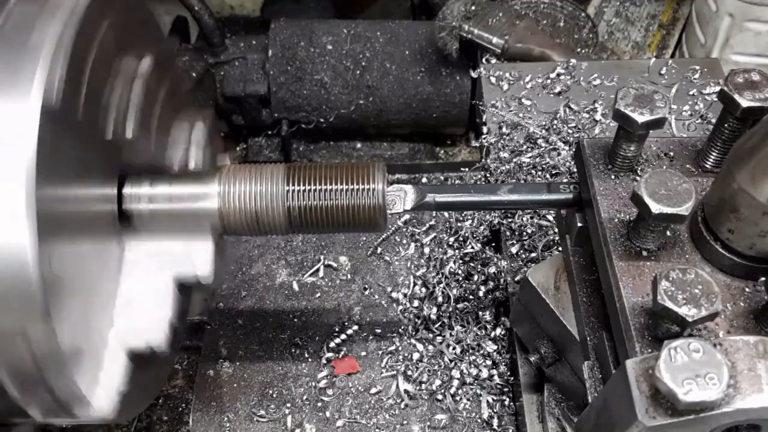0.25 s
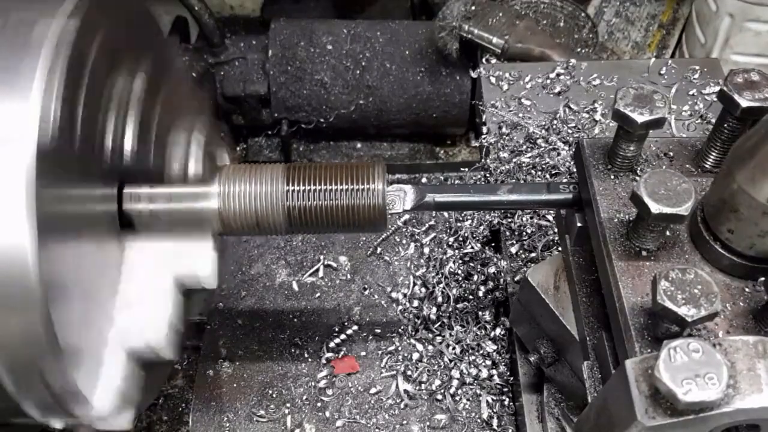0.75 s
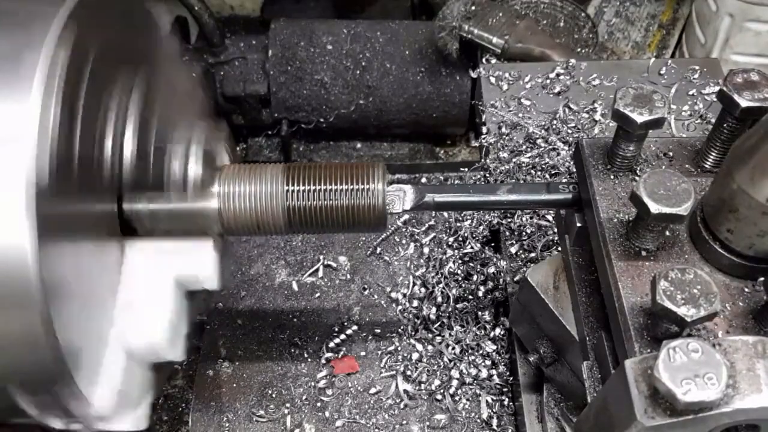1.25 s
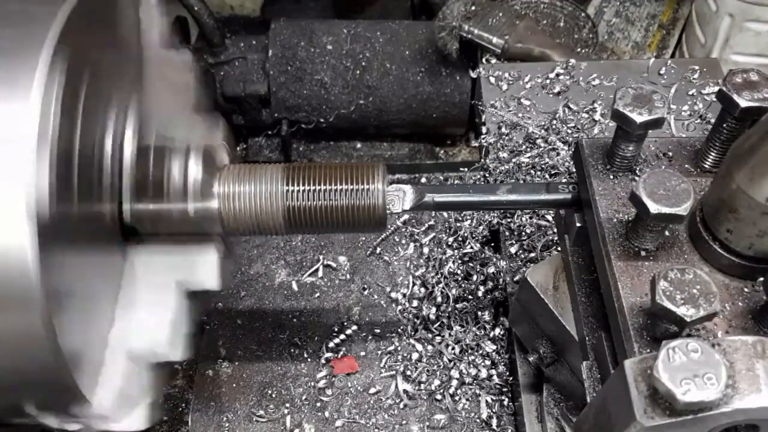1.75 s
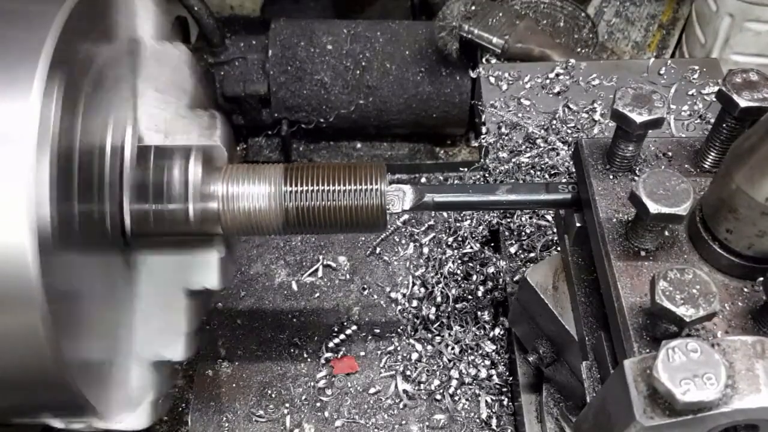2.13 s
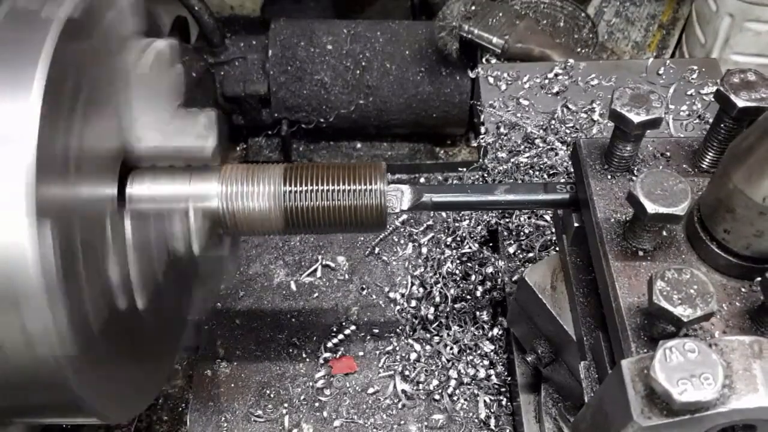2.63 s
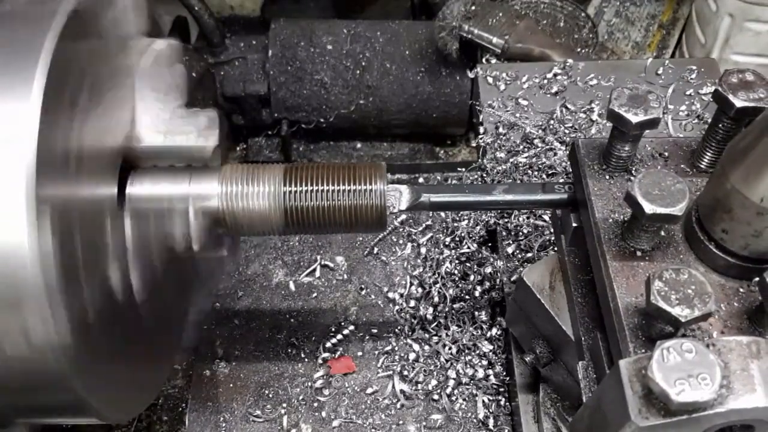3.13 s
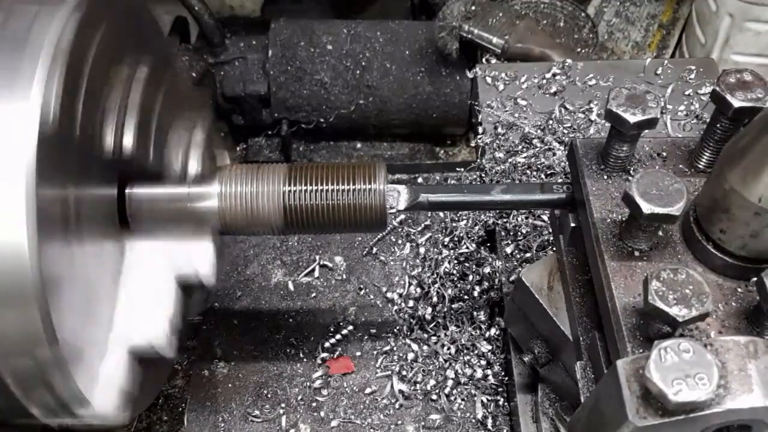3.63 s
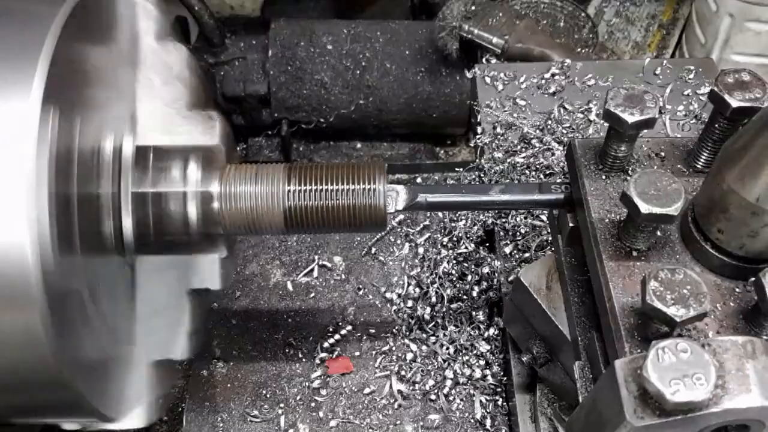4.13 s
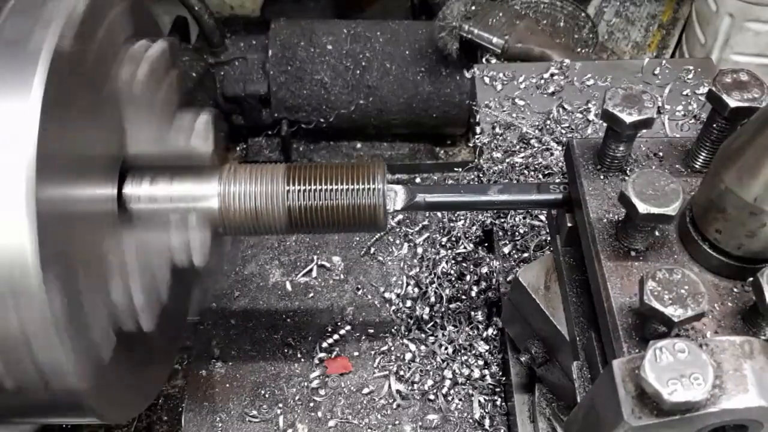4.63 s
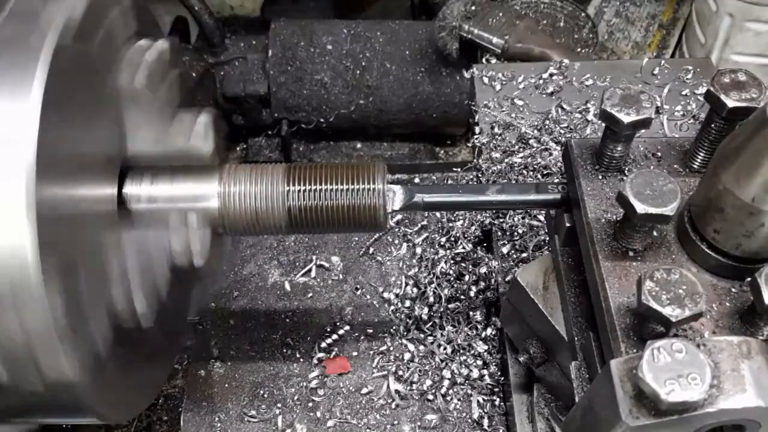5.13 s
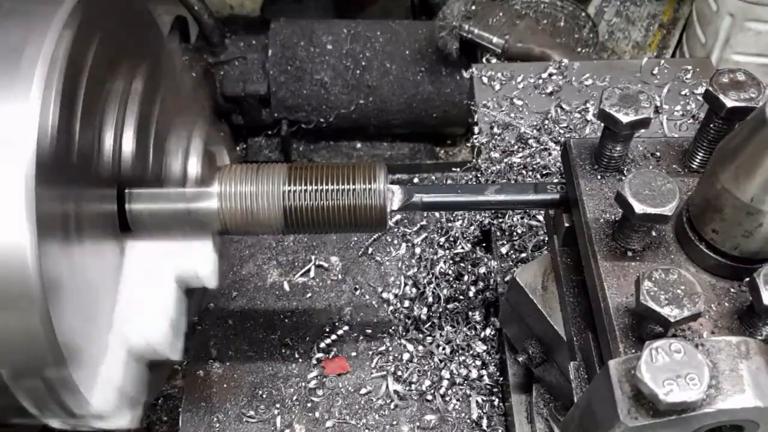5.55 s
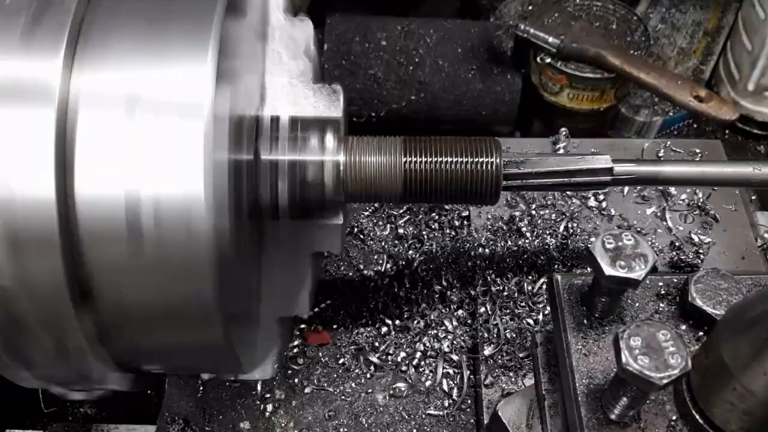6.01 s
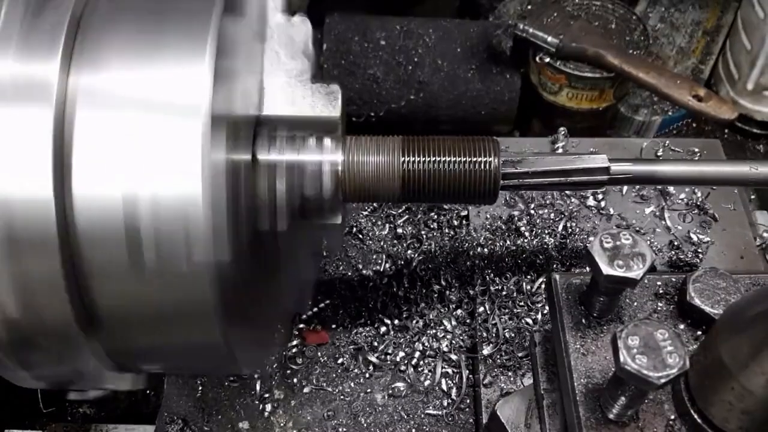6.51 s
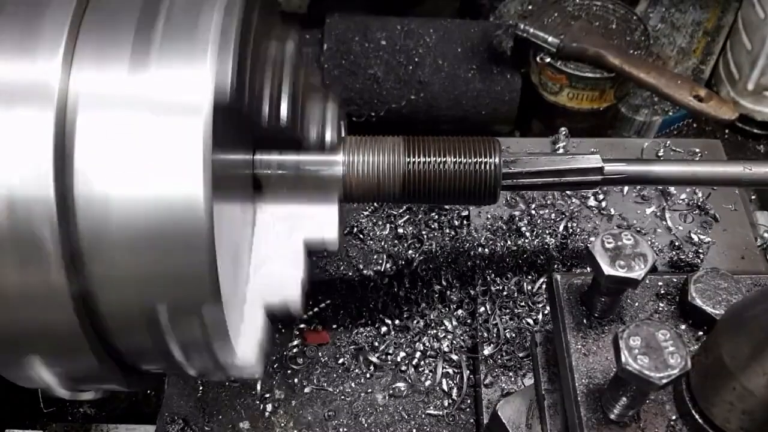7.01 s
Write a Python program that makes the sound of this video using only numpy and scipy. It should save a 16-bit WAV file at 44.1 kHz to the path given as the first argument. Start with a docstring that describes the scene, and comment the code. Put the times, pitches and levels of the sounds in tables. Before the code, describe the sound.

A stereo microphone near a metal lathe catches steady hum, buzzy whine and soft cutting hiss, with the tool singing at a high, slightly wobbling pitch. Another motor puffs in just before the sound jumps, sped up and far louder, into a shrill, fluttering metal shriek. It stops abruptly; the lathe continues quietly at its natural pitch, whirring and rumbling unevenly with light chip clicks and no squeal.

```python
"""Workshop: a lathe bores a steel bolt with motor hum, a whining rotor, a rumbling casing and a chattering bar.
Hum, whine and chatter are sums of sines; casing, chips and air are coloured noise with resonances.
The middle of the job plays about four times too fast and much louder: all of it jumps two octaves into a squeal.
After a hard cut the lathe drills at about natural speed, without chatter.
A second motor nearby, hum plus coloured hiss, runs for a moment across the jump into the fast part."""
import sys
import numpy as np
from scipy import signal
from scipy.fft import rfft, irfft, next_fast_len
from scipy.io import wavfile
from scipy.ndimage import uniform_filter1d

SR = 44100
rng = np.random.default_rng(int(sys.argv[2]) if len(sys.argv) > 2 else 0)


def generate_wav(sig):
    """Save sig (samples, or channels by samples) to the path in sys.argv[1] as 16-bit PCM at SR."""
    pcm = np.round(np.clip(np.atleast_2d(sig).T, -1, 1) * 32767).astype(np.int16)
    wavfile.write(sys.argv[1], SR, pcm)


N = 320607

FAST_S, DRILL_S = 2.2585, 6.1378  # playback speeds up; cut to drilling
SHAFT_HZ, HUM_HZ, SPINDLE_HZ = 24.772, 100.0, 4.056


def gain_of(db):
    """Decibels to gain."""
    return 10 ** (np.asarray(db) / 20)


def read(points, hz):
    """Every column of a table at these frequencies, linear in log frequency."""
    f, *columns = np.transpose(points)
    return [np.interp(np.log(hz + 1), np.log(f + 1), c) for c in columns]


def wander(t, rate_hz):
    """Slow chance of rms near 1, mostly below rate_hz on the clock t."""
    knots_hz = rate_hz * 8
    knots = rng.standard_normal(int(t[-1] * knots_hz) + 20)
    knots = uniform_filter1d(knots, size=4) * 2
    return np.interp(t * knots_hz, np.arange(len(knots)), knots)


def tone(t, hz, db, waver_db):
    """A sine on the lathe's own clock t, wavering in level."""
    level = gain_of(db + waver_db * wander(t - t[0], 6))
    return np.sqrt(2) * level * np.sin(2 * np.pi * hz * t)


def patchy(s, speed, patchy_db, lift):
    """Two white noises that share drifting louder and softer patches and a gain lift(Hz, s)."""
    hz, at, z = signal.stft(rng.standard_normal((2, len(s))), SR, nperseg=256)
    patches = uniform_filter1d(rng.standard_normal(z.shape[1:]), size=8, axis=0)
    patches = uniform_filter1d(patches, size=6, axis=1)
    z *= gain_of(patchy_db * patches / patches.std())
    z *= lift(hz[:, None] / speed, s[0] + at)
    return signal.istft(z, nperseg=256)[1][:, :len(s)]


def heard(tones, noise, power, speed):
    """Colours the noise by power(Hz), adds the tones and spreads both over the microphone pair."""
    # microphone pair: f/Hz, left minus right/dB, left lead/rad, likeness of the noise/0-1
    pair = [(60, 1, 0.44, 0.88), (100, 3.5, 0.27, 1), (196, 8, 0.24, 0.94), (450, 7, 1.03, 0.9),
            (700, 9, 0.66, 0.76), (1380, 15.5, -0.73, 0), (1990, 12, 1.94, 0.6), (3400, 14.5, 2, 0),
            (5400, 20, -0.053, 0.52), (7900, -4.5, 0, 0), (15000, 0, 0, 0.6)]
    size = next_fast_len(len(tones))
    hz = np.fft.rfftfreq(size, speed / SR)  # before the speed factor
    pan_db, lead_rad, same = read(pair, hz)
    same = np.clip(same, 0, 1)
    a, b = rfft(noise, size) * np.sqrt(power(hz) * SR / 2 / speed)
    clean = rfft(tones, size)
    left = clean + a
    right = clean + same * a + np.sqrt(1 - same ** 2) * b
    right = right * np.exp(-1j * lead_rad)
    g = gain_of(pan_db)
    return irfft(np.array([g * left, right]) * 2 / (1 + g), size)[:, :len(tones)]


def chatter(s, t, speed, bend_hz, spindle_rad):
    """The bar sings near its mode; run-out bends the pitch once a turn, chance shakes it and makes it falter."""
    # bar, drifting as the cut deepens, at natural speed: t/s, f/Hz, level/dB
    bar = [(0, 1403, -47), (.25, 1416, -48), (.5, 1407, -48), (1.0, 1417, -47), (1.25, 1421, -47.5),
           (1.5, 1403, -48.5), (1.75, 1414, -47.5), (2.0, 1408, -49), (2.26, 1416, -48.5), (2.6, 1410, -48),
           (3.3, 1408, -47.7), (3.67, 1407, -46.4), (4.02, 1411, -47.4), (4.37, 1408, -48.2),
           (5.08, 1410, -48.1), (5.78, 1407, -48.5), (6.14, 1403, -49)]
    drift_hz, shake_hz, shake_db = 3, 6, 1.5  # slow and quick chance in pitch, quick chance in level
    falter_db, falter_hz = -10, -16  # sag per unit of falter
    when, hz, db = np.transpose(bar)
    falter = np.clip(wander(t, 18) - 1.2, 0, None)
    bend = bend_hz * np.cos(2 * np.pi * SPINDLE_HZ * t + spindle_rad)
    bend += drift_hz * wander(t, 1.5) + shake_hz * wander(t, 22)
    pitch_hz = speed * (np.interp(s, when, hz) + bend + falter_hz * falter)
    angle = 2 * np.pi * np.cumsum(pitch_hz) / SR
    level = gain_of(np.interp(s, when, db) + shake_db * wander(t, 22) + falter_db * falter)
    return np.sqrt(2) * level * (np.sin(angle) + gain_of(-13) * np.sin(2 * angle))


def motor(t, order, shaft_rad):
    """Hum, and a slot whine whose sidebands are locked to the shaft; order 0 bores, 1 drills."""
    # mains hum and its partners: f/Hz, boring level/dB, drilling level/dB
    hums = [(HUM_HZ, -55.5, -56), (HUM_HZ + SHAFT_HZ, -65.5, -64.5), (2 * HUM_HZ, -58, -56.5),
            (4 * HUM_HZ, -70, -67.5), (59.5, -78.5, -77), (66.3, -75.5, -76), (150, -78.5, -76)]
    # whine tones, slot tone + n shaft turns + k hums: n, k
    orders_nk = [(-1, -1), (0, -1), (1, -1), (-1, 0), (0, 0), (1, 0), (2, 0), (3, 0), (0, 1), (1, 1),
                 (1, 2)]
    # the same tones: boring level/dB, drilling level/dB, beat depth, beat sharpness/0-1, beat start/s
    whines = [(-65, -58, 0.046, 0.1, .1), (-55, -53, 0.02, 0, 0.08), (-66.5, -59, .05, 0, .1),
              (-66, -71, 0.043, .1, .1), (-49, -45, 0.031, 0, 0.064), (-44.5, -44, 0.12, 0.5, 0.76),
              (-56.5, -50, 0.063, 0, 0.24), (-52.5, -55.5, 0.52, 0, 0.012), (-64.5, -75, 0.62, 0.1, .01),
              (-67.5, -70, 0.05, .1, .01), (-72, -69, .1, .1, .1)]
    slot_hz = 644.97
    slip_hz = HUM_HZ - 4 * SHAFT_HZ  # four turns lag one hum: a slow throb
    out = sum(tone(t, row[0], row[order + 1], 1.0) for row in hums)
    shaft = 2 * np.pi * SHAFT_HZ * t - shaft_rad
    for (n, k), row in zip(orders_nk, whines):
        depth, sharpness, start_s = row[2:]
        slip = np.exp(2j * np.pi * slip_hz * (t - start_s))
        beat = 1 - 1j * depth * slip / (1 - np.clip(sharpness, 0, .9) * slip)
        angle = 2 * np.pi * (slot_hz + k * HUM_HZ) * t + n * shaft
        angle += 1.263 * n * (n - 1)  # the pitch sweeps in each turn
        level = gain_of(row[order] + 1.12 * wander(t - t[0], 4))
        out += np.sqrt(2) * level * (beat * np.exp(1j * angle)).real
    return out


def casing(hz, spectrum, order):
    """Noise power per Hz: a broad spectrum plus the resonances of casing and tool post."""
    # resonances: f/Hz, full width at -6 dB/Hz, boring peak/dB per Hz, drilling peak/dB per Hz
    modes = [(85.3, 8, -75, -81), (189.7, 14.5, -71, -74), (92.6, 5.1, -64.5, -63),
             (224.8, 17.8, -63, -65.5), (255.6, 30.5, -65.5, -65.5), (369, 8.3, -76.5, -75),
             (514, 68, -76, -79), (678, 105, -75, -81), (870, 36, -81.5, -79), (970, 113, -80.5, -80.5),
             (1387, 210, -79, -96), (1607, 26, -78, -78), (2110, 34, -81.5, -81), (2352, 137, -79.5, -99),
             (2583, 30, -74.5, -91), (2792, 113, -77.5, -94), (3140, 66, -81.5, -84),
             (8540, 1800, -100, -112), (12400, 700, -100, -118)]
    power = gain_of(2 * read(spectrum, hz)[0])
    for mode in modes:
        f, width = mode[:2]
        power = power + gain_of(2 * mode[order + 2]) / (1 + (2 * (hz - f) / width) ** 2) ** 2
    return power


def headstock(at, speed, lumps_db):
    """Gain of the headstock rumble: uneven chance swells, some placed by hand."""
    # rumble swells: t/s, level/dB
    swells = [(0, -6), (.2, -4), (.32, 6), (.4, -6), (.6, -6), (.68, 11), (.76, -7), (1.13, 3), (1.29, -2),
              (1.4, 5), (1.72, -1), (1.86, 3), (2.25, -1.5), (4.4, 0), (6.13, -1), (6.31, 7), (6.46, -8),
              (6.59, 6), (6.68, -6), (6.75, 6), (6.9, -5), (6.97, 5), (7.27, -2)]
    lumps = wander(speed * (at - at[0]), 5.5)
    return gain_of(np.interp(at, *np.transpose(swells)) + lumps_db * lumps)


def cutting(at, clock, turn_db):
    """Gain of the cutting hiss: the cut bites once a turn and chips snap off the tool."""
    # chips: t/s, burst level over the hiss/dB
    chips = [(.1062, 6), (.2139, 6.5), (.4599, 4), (.5177, 2), (.7008, 8), (.9138, 6), (1.3583, 6),
             (6.2282, 5), (6.3978, 8.5), (6.726, 12), (6.755, 4), (6.8846, 4), (7.0524, 7), (7.213, 5)]
    turn = gain_of(turn_db * np.cos(2 * np.pi * SPINDLE_HZ * clock - .6))
    snaps = sum(gain_of(2 * db) * (at > c - .001) * np.exp(-abs(at - c) / .005) for c, db in chips)
    return turn * np.sqrt(1 + snaps)


def lathe(s, t, speed, spectrum, order, turn_db, lumps_db, bar=0):
    """Motor tones, the bar, and noise ringing in the casing; speed scales the noise frequencies."""
    def lift(hz, at):
        low = headstock(at, speed, lumps_db)
        high = cutting(at, np.interp(at, s, t), turn_db)
        high = np.where((hz > 1500) & (hz < 5600), high, 1)
        return np.where((hz > 150) & (hz < 310), low, high)

    shaft_rad = (2.1, 2.33)[order]  # at clock zero, boring and drilling
    tones = motor(t, order, shaft_rad) + bar
    noise = patchy(s, speed, 1.18, lift)
    return heard(tones, noise, lambda hz: casing(hz, spectrum, order), speed)


def neighbour(s, t, speed):
    """The second motor starts with a puff of hiss, hums in step with the same mains, and a thin whine swells."""
    # second motor's noise: f/Hz, level/dB per Hz
    spectrum = [(20, -97), (60, -89), (85, -70), (115, -75), (150, -79), (230, -74), (400, -86),
                (1500, -97), (5000, -89), (6500, -106), (9000, -100), (13000, -97), (16000, -102)]
    # second motor's hum: f/Hz, level/dB
    hums = [(HUM_HZ, -45), (84, -57)]
    # second motor's run: start/s, stop/s
    run_s = (1.673, 2.382)
    start_s, stop_s = run_s
    on = np.clip((s - start_s) / 0.0032, 0, 1) * np.clip((stop_s - s) / 0.0044, 0, 1)
    puff = 1 + 2.2 * np.exp(-abs(s - start_s) / .012)
    swell = np.clip((s - start_s) / 0.36, 0, 1) * (s < FAST_S)  # no whine in the fast part
    whine = swell * tone(t, hz=1157, db=-63, waver_db=1.1)
    tones = on * (sum(tone(t, *row, 0.56) for row in hums) + whine)
    hiss = on * puff * rng.standard_normal((2, len(s)))
    return heard(tones, hiss, lambda hz: gain_of(2 * read(spectrum, hz)[0]), speed)


def scene():
    """Three stretches joined by hard cuts; t is the lathe's own clock."""
    # broad noise of casing, chips and air while boring: f/Hz, level/dB per Hz
    boring = [(20, -106), (55, -96.5), (78, -85), (145, -91.5), (320, -85.5), (590, -85), (800, -84.5),
              (1100, -83.5), (2000, -86.5), (3400, -91.5), (4800, -90), (6200, -105), (11000, -108),
              (15000, -113)]
    # the same while drilling: f/Hz, level/dB per Hz
    drilling = [(20, -106), (55, -98), (78, -90), (145, -93), (320, -83), (590, -84), (800, -83),
                (1100, -83), (1500, -86.5), (3500, -93), (4700, -93), (6300, -108), (10000, -110),
                (15000, -118)]
    # run-out, slow then fast part: bend/Hz, spindle angle at clock zero/rad
    runout = [(9.3, -3.05), (6.2, 2.73)]
    speed, fast_db, drill_clock_s = 3.979, 20.5, 6.9  # fast part: speed-up, level lift; drilling: clock offset
    slow, fast, drill = np.split(np.arange(N) / SR, [round(FAST_S * SR), round(DRILL_S * SR)])

    bar = chatter(slow, slow, 1, *runout[0])
    first = lathe(slow, slow, 0.99, boring, order=0, turn_db=1.0, lumps_db=0.2, bar=bar)
    first += neighbour(slow, slow, 1)

    t = FAST_S + speed * (fast - FAST_S)
    bar = chatter(fast, t, speed, *runout[1])
    second = lathe(fast, t, speed, boring, order=0, turn_db=1.15, lumps_db=2.5, bar=bar)
    second += neighbour(fast, t, speed)

    last = lathe(drill, drill - drill_clock_s, 0.98, drilling, order=1, turn_db=-0.1, lumps_db=1.3)
    return np.hstack([first, gain_of(fast_db) * second, last])


def record(dry):
    """Treble droops 3 dB per kHz above 13 kHz, then a band limit at 15.8 kHz."""
    hz = np.linspace(0, SR / 2, 65)
    droop_db = -3.0 * np.clip(hz - 13000, 0, None) / 1000
    droop = signal.firwin2(129, hz, gain_of(droop_db), fs=SR)
    edge = signal.firwin(511, 15800, window=("kaiser", 9), fs=SR)
    return signal.oaconvolve(dry, np.convolve(droop, edge)[None], "same")


dry = scene()
out = record(dry)
generate_wav(out)
```